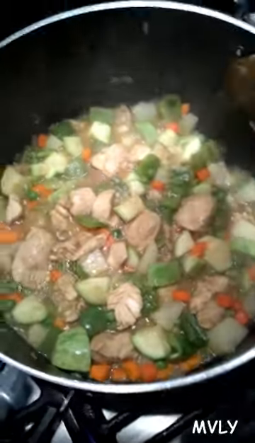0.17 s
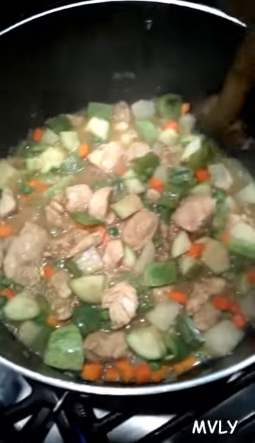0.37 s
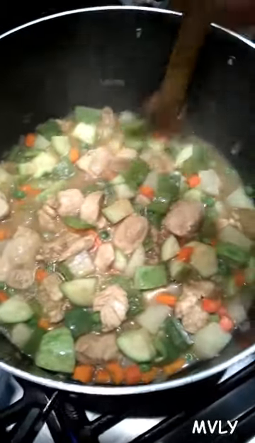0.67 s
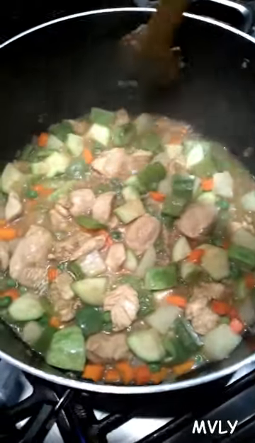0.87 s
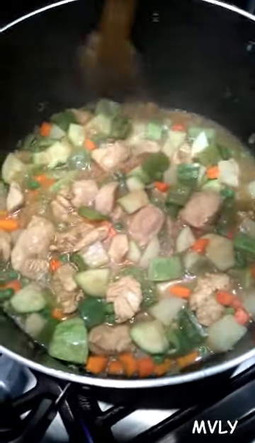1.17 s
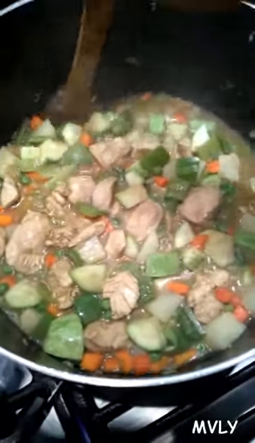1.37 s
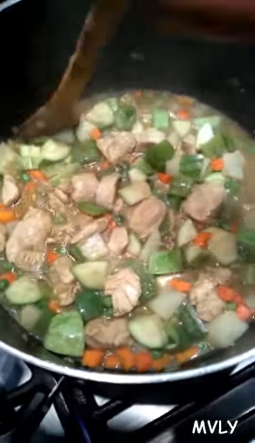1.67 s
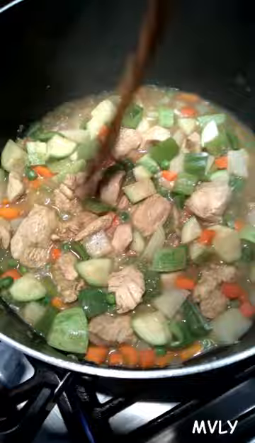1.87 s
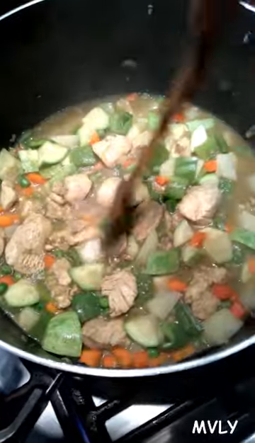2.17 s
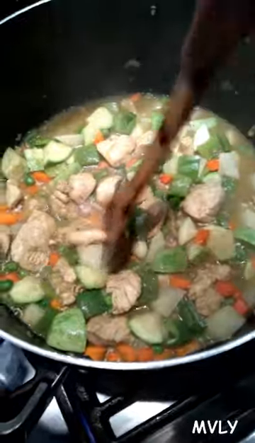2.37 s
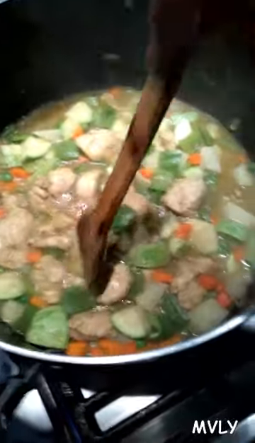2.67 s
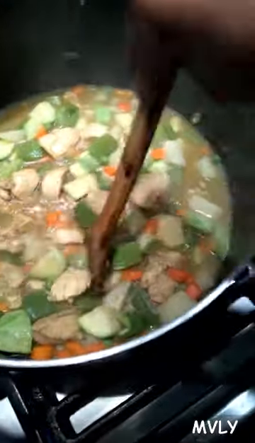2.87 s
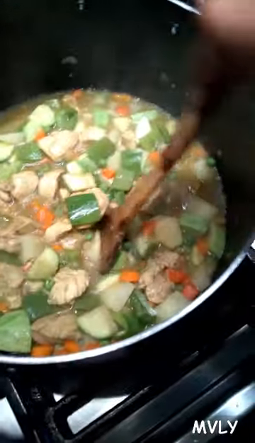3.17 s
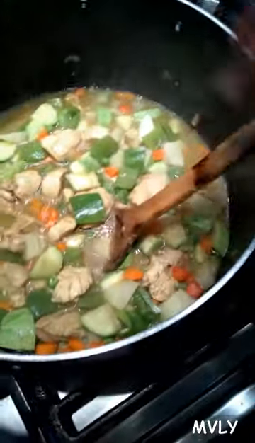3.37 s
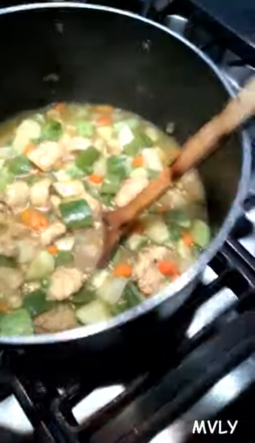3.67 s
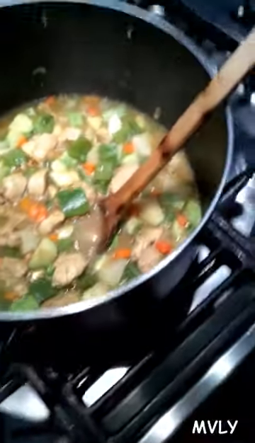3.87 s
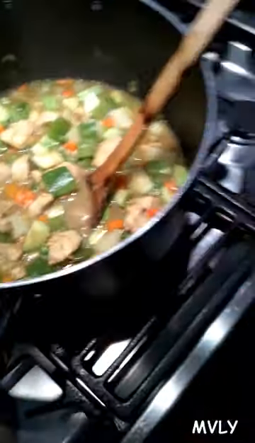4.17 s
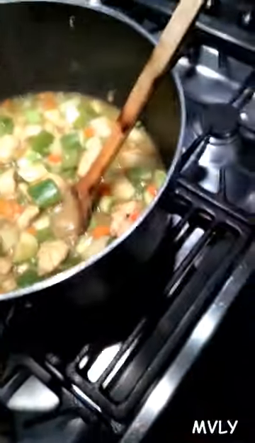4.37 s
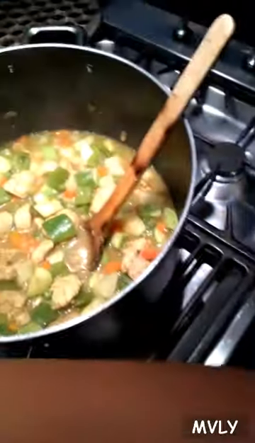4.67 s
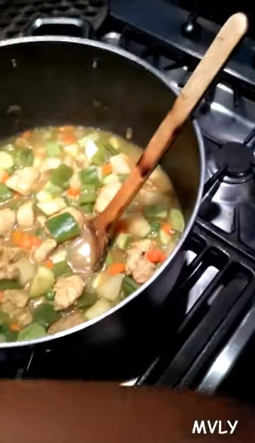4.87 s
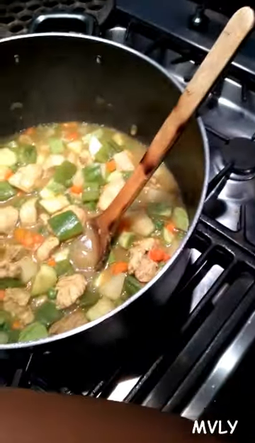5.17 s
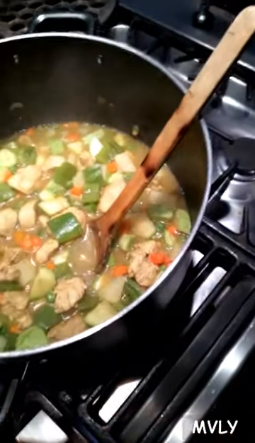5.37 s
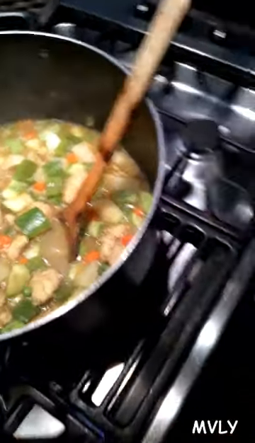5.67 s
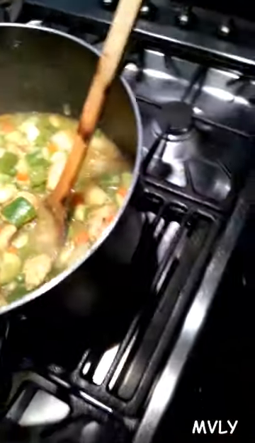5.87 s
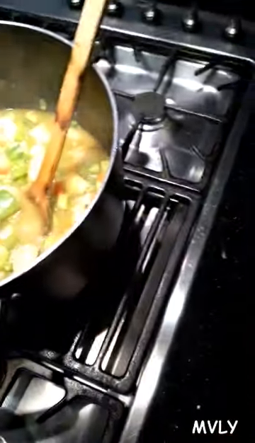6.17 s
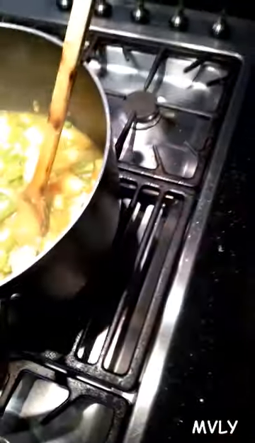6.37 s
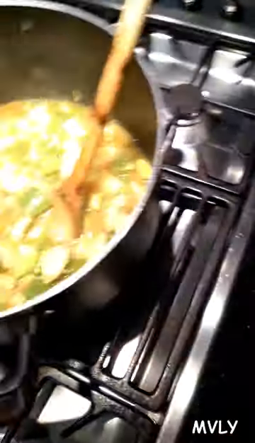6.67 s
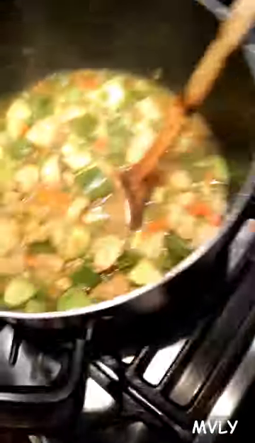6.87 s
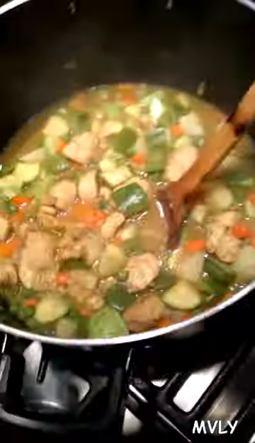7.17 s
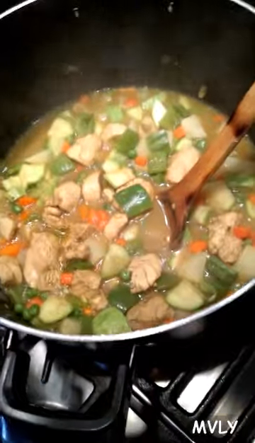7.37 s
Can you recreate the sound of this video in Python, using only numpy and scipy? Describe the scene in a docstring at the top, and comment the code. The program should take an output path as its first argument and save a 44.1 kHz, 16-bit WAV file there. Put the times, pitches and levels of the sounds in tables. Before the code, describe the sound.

A close handheld phone hears stew simmering in a metal pot on a gas hob. Sharp, dry, bright bubble ticks burst in uneven clumps, leaning left, with crackling froth, fine fizz and faint gurgles beneath. At 0.2 s a wooden spoon gives a quick double clack on the pot; pops follow until about 1 s. Very faint spoon touches come at 1.05 and 1.4 s, then pops thicken from 1.6 to 2.9 s with tiny crackling runs. Strong pops cluster at 3.2 s; at 3.37 s the spoon drops on the rim in a brief slowing wood-and-metal rattle, with another strong pop at 3.4 s. Ticks, small plops and wet squelches continue, busy from 5 to 5.8 s. About 5.9-6.6 s is nearly quiet, then sparse ticks return to 7.5 s. Soft burner rush, faint low hum, dull handling bumps near 4.5 and 6.1 s, and short kitchen echo.

```python
"""Kitchen, gas hob: a chicken and vegetable curry simmers in a metal pot, heard by a phone held over the rim.
Bubbles burst with sharp ticks that rattle round the pot (clicks through random wall reflections).
A wooden spoon knocks the wall, stirs, and drops against the rim (decaying modes plus a noise crack).
Fizz, dense bubble runs and squelches are coloured clicks; gurgles, taps and plops are short tones.
Behind them: a short echo, burner noise, mains hum and dull rumbles of the held phone."""
import sys
import numpy as np
from scipy import signal
from scipy.fft import rfft, irfft
from scipy.io import wavfile

SR = 44100
rng = np.random.default_rng(int(sys.argv[2]) if len(sys.argv) > 2 else 0)


def master(y):
    """Save y as 16-bit WAV."""
    cut = np.clip(np.atleast_2d(y).T, -1, 1)
    pcm = np.round(cut * 32767)  # scale
    wavfile.write(sys.argv[1], SR, pcm.astype(np.int16))


N = 331632
T = np.arange(N) / SR
HIT = T[:SR // 2]  # time axis of one struck sound [s]


def undb(db):
    """Decibels to gain."""
    return 10 ** (np.asarray(db) / 20)


def unit(x):
    """Scale to rms 1."""
    return x / np.sqrt(np.mean(x ** 2))


def burst(x):
    """Scale to the energy of 3 ms at rms 1."""
    return x * np.sqrt(.003 * SR / np.sum(x ** 2))


def along(points, hz):
    """Read (frequency [Hz], value) points on a log-frequency axis."""
    f, value = np.transpose(points)
    return np.interp(np.log(hz + 1), np.log(f), value)


def colour(x, points):
    """Causal minimum-phase filter with the given (frequency [Hz], gain [dB]) response."""
    size = 2048
    gain = undb(along(points, np.fft.rfftfreq(size, 1 / SR)))
    cepstrum = irfft(np.log(gain))
    # fold the cepstrum onto positive time
    cepstrum[1:size // 2] *= 2
    cepstrum[size // 2 + 1:] = 0
    response = irfft(np.exp(rfft(cepstrum)))
    return signal.fftconvolve(x, response[None], axes=-1)[:, :x.shape[-1]]


def sides(pan_db):
    """Left and right gains of total power 1; pan is left minus right."""
    gains = undb(np.array([[pan_db], [-pan_db]]) / 2)
    return gains / np.sqrt(np.sum(gains ** 2))


def add(track, start_s, x):
    """Mix a sound into the track."""
    start = max(int(start_s * SR), 0)
    track[:, start:start + x.shape[1]] += x[:, :N - start]


def ring(modes, wander=0.0022, patchy_db=3, t=HIT):
    """Decaying modes: the point of contact favours some; each reaches the two ports at its own phases."""
    out = 0
    for hz, db, t60_s in modes:
        detuned_hz = hz * (1 + wander * rng.standard_normal())
        phase = 2 * np.pi * (detuned_hz * t + rng.random((2, 1)))
        level_db = db + patchy_db * rng.uniform(-0.11, 1) - 60 * t / t60_s
        out = out + undb(level_db) * np.sin(phase)
    return out * (1 - np.exp(-t * SR / 8))  # onset over 8 samples


def crackle(rate_hz, spread_db, pan_db, scatter_db=5):
    """Countless tiny bursts of very unequal size, scattered over the surface."""
    size_db = spread_db * np.minimum(rng.exponential(size=N), 4)
    size = undb(size_db) * (rng.random(N) < rate_hz / SR)
    sign = rng.choice([-1, 1], (2, N))
    clicks = size * sign * undb(scatter_db * rng.uniform(-1.56, 1, (2, N)))
    return unit(clicks) * sides(pan_db)


# bubbles bursting in clumps:
# (time [s], level [dB], left minus right [dB], midrange body [dB], top-treble edge [dB])
POPS = [(.282, -15, -9, -14, 9), (.6042, -29, -5, -18, 5), (.6502, -22.5, 1, -13, -6),
        (0.6764, -24.5, -21, -14, 0), (0.7646, -26.5, -14, -24, 31), (0.881, -24.5, -3, -2, -2),
        (.938, -18.5, -25, -11, 15), (1.389, -18, -13, 6, 18), (1.6226, -36, -12, -8, 32),
        (1.6337, -33.5, -14, 2, 18), (1.684, -28, -3, -22, 6), (1.7796, -17, -11, -20, 19),
        (1.8564, -19, -2, -4, 8), (1.9939, -16.5, -14.5, 2, 10), (2.07, -25, -7, -1, -16),
        (2.128, -17.5, -7, -22, 11), (2.16, -23, -27, -23, 16), (2.4492, -32.5, -2, 2.5, -21),
        (2.5433, -23.5, -2, -11, 8), (2.6325, -17, -11, -1, 29), (2.6411, -24, -11, -9, 29),
        (2.722, -19, -8, -8, 13), (2.9094, -29.5, -19, -13, 22), (3.1546, -24, 7, 5.5, 14),
        (3.1655, -20, -20, 3, 0), (3.1794, -25.5, 3, 4, 8), (3.1985, -13, -10, -21, 4),
        (3.2062, -8.5, -5.5, -10.5, -4.5), (3.3542, -27, -12, -10, 19), (3.4033, -10.5, -14, -8, 8),
        (3.492, -19, -17, -3, 27), (3.8772, -29, -16, -8, 3), (3.8865, -23, -19, -4, 18),
        (4.005, -29.5, -18, 3, 40), (4.193, -32.5, -7, -3, 16), (4.2588, -19, -13, 0, 24),
        (4.27, -28.5, -3, 18.5, 14), (4.4894, -34.5, -23, -5, 29), (4.558, -14.5, -13, 5, 20),
        (4.614, -30, -24, -29, 12), (4.6525, -27, -18, -32, 4), (4.7843, -37.5, -12, -17, 10),
        (4.9016, -27, 3, 18.5, -18), (5.0097, -18, -2, 9.5, 14), (5.0324, -22.5, -17, -3, 0),
        (5.1665, -26.5, -10, -1, -6), (5.2128, -20, -6, 5.5, 0), (5.231, -24, -13, 3, 14),
        (5.2532, -24, -21, -12, 10), (5.311, -16.5, -26, -2, 21), (5.399, -22.5, -8, 11, 12),
        (5.5533, -18, -5, 10, 19), (5.57, -16, -14, 7, 11), (5.607, -19, -2, 0, -5),
        (5.644, -18, -23, -7, 18), (5.7738, -29.5, -1, 13.5, -5), (6.6565, -33.5, 7, 14.5, -42),
        (6.811, -35.5, -10, 19, -5), (6.979, -20.5, -8.5, -12, 12), (7.045, -21.5, -5, -6.5, -2),
        (7.275, -34, -2, 25, 18), (7.4122, -27, 0.5, 15.5, -52), (7.476, -29, 0, 5.5, -24)]


def clumps(count=2, lag_s=.005, neighbour_db=-10, recover_s=0.0038, scatter_db=3, pan_scatter_db=4):
    """A burst sets off its neighbours: weaker ticks of like colour, weakest while the sauce still recoils."""
    rows = list(POPS)
    chances = rng.uniform(-0.92, 1, (len(POPS), count, 3))
    for (s, db, pan_db, body_db, edge_db), chance in zip(POPS, chances):
        for k, (when, size, place) in enumerate(chance):
            lag = lag_s * (k + abs(1 + when) / 2)
            recoil_db = 20 * np.log10(1 - np.exp(-lag / recover_s))
            tick_db = db + neighbour_db + recoil_db + scatter_db * size
            rows.append((s + lag, tick_db, pan_db + pan_scatter_db * place, body_db, edge_db))
    return rows


def tick(since, start, stretch, swell_s=0.0008, fade_s=0.00081, noise_db=-8, faint_s=0.0095, faint_db=-36):
    """A sharp tick in a short noise swell and fade, with sparse faint clicks around it."""
    count = len(since)
    envelope = np.exp(-np.abs(since) / (stretch * np.where(since < 0, swell_s, fade_s)))
    wave = undb(noise_db) * envelope * rng.standard_normal(count)
    wave[start] += 1
    clicks = rng.standard_normal(count) * (rng.random(count) < .01) * 10
    return wave + undb(faint_db) * stretch * clicks * np.exp(-np.abs(since) / faint_s)


def pot_wall(t, wall_s=0.0041, wall_db=-14):
    """Direct path plus dying wall reflections; the sound reaches the right port first."""
    echoes = rng.uniform(-1, 1, (2, len(t))) ** 9  # few strong, most faint
    paths = undb(wall_db) * np.exp(-t / wall_s) * echoes
    paths[1, 0] += 1
    paths[0, 17] += 1  # delayed 17 samples
    return paths


# tick of a bursting bubble: (frequency [Hz], gain [dB])
POP_COLOUR = [(150, -35.5), (800, -44.5), (2600, -28.5), (4500, -28), (6200, -14), (8300, -10), (9200, 1.5),
              (9800, 0.5), (10800, -11), (12000, -21), (15000, -33.5)]


def pops(body_stretch=0.23, cavity_hz=3200, cavity_t60_s=0.01, cavity_db=-31, far_db=-7, aim=0.5):
    """Bursts tick, longer when full-bodied; the wall reflects them. Returns direct sound and echo feed."""
    direct, spread = np.zeros((2, N)), np.zeros((2, N))
    lead_s = .006
    t = T[:SR // 16]
    since, start = t - lead_s, int(lead_s * SR)
    hz, base_db = np.transpose(POP_COLOUR)
    body = along([(900, 0.64), (2600, 1.0), (4500, 1.0), (8000, 0.021)], hz)
    edge = along([(10000, 0.2), (13000, 0.98)], hz)
    for s, db, pan_db, body_db, edge_db in clumps():
        source = tick(since, start, stretch=undb(body_stretch * body_db))
        wave = signal.fftconvolve(pot_wall(t), source[None], axes=-1)[:, :len(t)]
        wave = colour(wave, np.c_[hz, base_db + body * body_db + edge * edge_db])
        # the opened hollow rings briefly, most in full-bodied bursts
        hollow = ring([(cavity_hz, 0, cavity_t60_s)], wander=0.22, t=t[:-start])
        hollow = np.pad(hollow, ((0, 0), (start, 0)))
        hollow_db = cavity_db + 1.53 * min(body_db, 20)
        wave = burst(wave) + undb(hollow_db) * burst(hollow)
        wave = np.array([burst(side) for side in wave]) * undb(db)
        add(direct, s - lead_s, wave * sides(pan_db))
        # the closer under the right port, the less a bubble feeds the kitchen
        add(spread, s - lead_s, wave * undb(far_db + aim * pan_db))
    return direct, spread


def froth(level_db=-21, fade_s=0.032, rate_hz=900, spread_db=9.5, pan_db=-8, midrange_db=7):
    """Each burst leaves a patch of froth whose tiny bubbles crackle away."""
    power = np.zeros((1, N))
    for s, db, *_ in POPS:
        patch = undb(db) * np.exp(-HIT / fade_s)
        add(power, s, patch[None] ** 2)
    grains = colour(crackle(rate_hz, spread_db, pan_db), POP_COLOUR)
    grains = colour(grains, [(4500, midrange_db), (8000, 0.0045)])
    return unit(grains) * np.sqrt(power) * undb(level_db)


# spoon on pot: (time [s], relative level [dB], wood [dB], metal [dB], crack [dB], weight [dB],
# left minus right [dB], length of the rattle [s])
KNOCKS = [(0.181, -21.5, -6.5, -14.5, -0.5, 1, -0.5, 0.003), (.185, -16, -11.5, -2.5, -0.5, -10, 3, 0.003),
          (1.0502, -32, 1.5, -27, -0.5, 2.5, 1.5, 0.00022),
          (1.3745, -34, -0.5, -21.5, -5, 9.5, 4.5, 0.00014), (3.3687, -20, -4, -4.5, 3, 10.5, 1, .064)]


def contacts(count=8, gap_s=.0042, slowing=1.24, fall_db=-2.0, soften_db=-2.0, settle_db=1.5):
    """The spoon rattles after a blow: each contact comes later, weaker, softer and heavier."""
    lags = np.r_[0, np.cumsum(gap_s * slowing ** np.arange(count - 1))]
    rows = []
    for s, db, wood_db, metal_db, crack_db, weight_db, pan_db, length_s in KNOCKS:
        for k, lag in enumerate(lags):
            if k == 0 or lag < length_s:
                rows.append((s + lag, db + k * fall_db, wood_db, metal_db, crack_db + k * soften_db,
                             weight_db + k * settle_db, pan_db))
    return rows


# modes of the spoon: (frequency [Hz], level [dB], t60 [s])
WOOD = [(299, -21, 0.16), (442, -18.5, 0.087), (850, -7, 0.043), (1301, -9, 0.052), (2170, -4, 0.033),
        (2353, -7, 0.066), (2720, 3.5, 0.038), (2938, 1, 0.048)]
# modes of the filled pot: (frequency [Hz], level [dB], t60 [s])
METAL = [(303, -17, 0.19), (787, -23, .28), (906, -26, .22), (1133, -19, .25), (1310, -21, 0.18),
         (2560, -15.5, .2), (3010, -6.5, .11), (3110, -8, .14), (3194, -6.5, 0.16), (3280, 0, 0.088),
         (3470, 4, 0.102), (3640, -1.5, 0.11), (3714, -10, 0.15), (3920, 6.5, 0.107), (4100, -6, 0.12),
         (4600, -14, 0.132), (5200, -16.5, .15), (5210, -6.5, 0.12), (5700, -9.5, 0.14)]
# crack of the contact: (frequency [Hz], gain [dB])
CRACK = [(200, -7.5), (550, -10), (1500, -3.5), (2200, -8), (3000, 2.5), (3900, 8.5), (4300, 1),
         (4900, -3.5), (5300, 2.5), (6250, -2.5), (7500, -1.5), (9200, 1.5), (11500, -16.5), (15000, -25.5)]


def knocks(crack_s=0.0051, shell_s=0.013, shell_db=-17, wood_trim_db=3, metal_trim_db=4, crack_trim_db=0,
           wood_far_db=-9):
    """Blows ring spoon and pot over a crack dying in the pot's dense high modes; weight lifts the lows."""
    direct, spread = np.zeros((2, N)), np.zeros((2, N))
    for s, db, wood_db, metal_db, crack_db, weight_db, pan_db in contacts():
        fade = np.exp(-HIT / crack_s) + undb(shell_db) * np.exp(-HIT / shell_s)
        crack = colour(rng.standard_normal((2, len(HIT))) * fade, CRACK)
        spoon = undb(wood_db + wood_trim_db) * burst(ring(WOOD, wander=0.0079, patchy_db=1.5))
        pot = undb(metal_db + metal_trim_db) * burst(ring(METAL, patchy_db=-1.5))
        pot = pot + undb(crack_db + crack_trim_db) * burst(crack)
        weight = [(100, -30.0), (280, 1.0 * weight_db), (800, 0.72 * weight_db),
                  (1400, 0.9 * weight_db), (2900, 8.0)]
        gain = 2 * undb(db) * sides(pan_db)
        add(direct, s, gain * colour(pot + spoon, weight))
        # the broad pot wall radiates into the room better than the slim spoon
        add(spread, s, gain * colour(pot + undb(wood_far_db) * spoon, weight))
    return direct, spread


# sauce squelches and the spoon slides: (time [s], length [s], centre [Hz], level [dB])
SQUELCHES = [(0, 0.041, 3530, -49.5), (0.42, 0.064, 1140, -59), (0.833, 0.016, 3400, -39.5),
             (1.24, 0.0096, 3150, -45), (3.166, 0.072, 850, -57.5), (3.269, 0.0046, 3970, -41.5),
             (4.161, 0.0094, 1080, -54), (4.799, 0.018, 900, -55.5), (6.347, 0.014, 1070, -55),
             (6.616, 0.006, 3780, -40.5), (6.75, 0.016, 4240, -47.5), (6.845, 0.0076, 4000, -46.5),
             (7.337, 0.075, 5440, -56.5)]


def squelches():
    """Wet pieces slide and part: dense clicks, coloured by the gap, swell quickly and fade slower."""
    out = np.zeros((2, N))
    t = T[:SR] - .5
    for s, length_s, hz, db in SQUELCHES:
        sparse = rng.random(SR) < .08
        clicks = sparse * rng.standard_normal((2, SR))
        gap = [(hz / 4, -30), (hz / 1.38, -13), (hz, 0), (1.45 * hz, -15), (3 * hz, -36)]
        wet = unit(colour(clicks, gap))
        width_s = np.where(t < 0, length_s / 2, length_s)
        swell = wet * undb(db) * np.exp(-(t / width_s) ** 2 / 2)
        add(out, s - .5, swell[:, t + s >= 0])
    return out


# dense runs of tiny bubble bursts: (time [s], length [s], level per layer [dB])
BUBBLE_RUNS = [(.675, 0.021, -46), (0.903, 0.012, -57), (2.669, 0.019, -43.5), (2.729, 0.0044, -53),
               (4.837, 0.011, -45.5), (4.9, 0.033, -57), (5.065, 0.016, -45.5), (5.821, 0.011, -50),
               (7.097, 0.021, -48.5)]


def bubble_runs(rate_hz=3200, spread_db=4, pan_db=-9, midrange_db=13, top_db=4):
    """Dense runs of tiny bubble bursts: a short crackling swell each."""
    swell = 0
    for s, length_s, db in BUBBLE_RUNS:
        swell = swell + undb(db) * np.exp(-((T - s) / length_s) ** 2 / 2)
    grains = colour(crackle(rate_hz, spread_db, pan_db), POP_COLOUR)
    return swell * unit(colour(grains, [(4000, midrange_db), (9000, 0), (13000, top_db)]))


# dull taps and bubble plops: (time [s], starting pitch [Hz], level [dB], t60 [s])
LOW_TONES = [(1.881, 1040, -35, 0.0093), (1.881, 1120, -37, .004), (4.559, 660, -36, 0.013),
             (4.88, 1890, -25, 0.0047), (5.64, 427, -41, 0.096), (6.088, 1007, -37, 0.02)]


def low_tones(glide_per_s=1.5):
    """Short low tones: dull taps and bubble plops, gliding up slightly where they last."""
    out = np.zeros((2, N))
    for s, hz, db, t60_s in LOW_TONES:
        tone = np.sin(2 * np.pi * hz * HIT * (1 + glide_per_s * HIT))
        wave = tone * undb(db - 60 * HIT / t60_s) * (1 - np.exp(-HIT / 0.00047))
        add(out, s, wave * np.ones((2, 1)))
    return out


def gurgle(rate_hz, low_hz, high_hz, cycles, spread_db, glide=0.097):
    """Bubbles under the surface: each rings for a few cycles and rises a little in pitch."""
    out = np.zeros((2, N))
    for when, pitch, size, pan in rng.random((int(rate_hz * N / SR), 4)):
        hz = low_hz * (high_hz / low_hz) ** pitch
        age = np.arange(int(cycles * SR / hz)) * hz / (cycles * SR)  # 0 to 1 over its life
        tone = np.sin(2 * np.pi * cycles * age * (1 + glide * age / 2))
        wave = tone * undb(-45 * age) * (1 - np.exp(-age * cycles))
        size_db = -spread_db * np.log(1 - .97 * size)
        add(out, when * N / SR, wave * undb(size_db) * sides(10 * (pan - .5)))
    return unit(out)


# fizz of the smallest bubbles: (time [s], level [dB])
SIMMER = [(0, -55), (2.9, -61.5), (3.4, -47), (3.8, -57), (4.5, -58), (5.6, -55.5), (5.95, -64),
          (6.5, -64.5), (7.5, -54)]
# its colour: (frequency [Hz], gain [dB])
FIZZ = [(1500, -21.5), (4500, -34), (7000, -15), (9700, -1.5), (11500, -14), (15000, -22)]


def simmer(shallow_db=-70, deep_db=-67):
    """Fine fizz at the edge of the pot, and bubbles working below the surface."""
    fizz_db = np.interp(T, *np.transpose(SIMMER))
    fizz = unit(colour(crackle(rate_hz=650, spread_db=6.5, pan_db=-14.0), FIZZ))
    shallow = gurgle(rate_hz=300, low_hz=623, high_hz=2550, cycles=12.08, spread_db=2.5)
    deep = gurgle(rate_hz=110, low_hz=232.0, high_hz=531, cycles=9.1, spread_db=0.0)
    return fizz * undb(fizz_db) + shallow * undb(shallow_db) + deep * undb(deep_db)


# the hand shifts on the phone: (time [s], pitch [Hz], level [dB], length [s])
BUMPS = [(3.043, 55, -54, 0.018), (4.521, 62, -41.5, 0.044), (6.114, 174, -52, 0.022)]


def bumps(pan_db=9):
    """Dull rumbles through the body of the phone: low noise under a bell-shaped swell."""
    out = 0
    for s, hz, db, length_s in BUMPS:
        body = [(hz / 2, -24), (hz, 0), (2 * hz, -14), (6 * hz, -45), (20 * hz, -80)]
        rumble = unit(colour(rng.standard_normal((1, N)), body))
        out = out + rumble * undb(db) * np.exp(-((T - s) / length_s) ** 2 / 2)
    return out * sides(pan_db)


# kitchen echo spectrum: (frequency [Hz], relative gain [dB])
ECHO = [(200, 1), (1000, 5.5), (3500, -2.5), (7000, 4.5), (9800, 1), (15000, 9.5)]
# its decay: (frequency [Hz], t60 [s])
ECHO_T60 = [(200, 0.33), (3500, 0.41), (9000, 0.28), (15000, 0.24)]


def kitchen(x, build_s=0.006, first_density=0.023, merge_s=.12):
    """Echo of a small hard room: separate reflections thicken into a wash; the treble dies first."""
    density = np.clip(first_density + (HIT / merge_s) ** 2, .001, 1)
    present = rng.random((2, len(HIT))) < density
    reflections = rng.standard_normal((2, len(HIT))) * present / np.sqrt(density)
    f, t, cells = signal.stft(reflections, SR, nperseg=256)
    cells = cells * undb(along(ECHO, f)[:, None] - 60 * t / along(ECHO_T60, f)[:, None])
    tail = signal.istft(cells, SR)[1][:, :len(HIT)] * (1 - np.exp(-HIT / build_s))
    tail = tail / np.sqrt(np.sum(tail ** 2) / 2)  # mean energy 1 per side
    return signal.fftconvolve(x, tail, axes=-1)[:, :N]


# burner and kitchen air: (frequency [Hz], relative gain [dB])
BURNER = [(15, -60), (25, -20), (48, -14), (73, -13), (106, 0.5), (172, -6.5), (326, -10.5), (438, -3),
          (691, -17), (1860, -18), (2370, -15.5), (4870, -21.5), (7090, -22), (9520, -14), (15000, -37.5)]
# likeness of the two ports: (frequency [Hz], left-right correlation [-1 to 1])
LIKENESS = [(150, .95), (300, 1), (600, 0.12), (1500, 0)]


def burner(rush_db=-55, hum_hz=101, hum_db=-63.5):
    """Soft steady rush of the flame, alike at both ports in the bass, with mains hum."""
    hz = np.fft.rfftfreq(N, 1 / SR)
    alike = np.clip(along(LIKENESS, hz), -1, 1)
    mid, side = rfft(rng.standard_normal((2, N))) * undb(along(BURNER, hz))
    opposed = np.array([[1], [-1]]) * side * np.sqrt(1 - alike)
    rush = irfft(mid * np.sqrt(1 + alike) + opposed, N)
    hum = np.sqrt(2) * np.sin(2 * np.pi * hum_hz * T)
    return unit(rush) * undb(rush_db) + undb(hum_db) * hum


def scene(pop_room_db=4, spoon_room_db=-5, sauce_room_db=-3):
    """Pot, spoon and hob in the kitchen."""
    ticks, ticks_far = pops()
    spoon, spoon_far = knocks()
    runs = bubble_runs() + bubble_runs()  # two independent layers of grains
    sauce = simmer() + low_tones() + squelches() + runs
    to_room = undb(pop_room_db) * ticks_far + undb(spoon_room_db) * spoon_far + undb(sauce_room_db) * sauce
    return ticks + froth() + spoon + sauce + kitchen(to_room) + burner() + bumps()


def record(dry, low_hz=42, top_hz=15300, clip=.82):
    """The phone thins the deep bass, clips the sharpest peaks and cuts the top."""
    thin = signal.sosfilt(signal.butter(2, low_hz, "high", fs=SR, output="sos"), dry)
    top_cut = signal.ellip(8, .2, 70, top_hz, fs=SR, output="sos")
    return signal.sosfilt(top_cut, np.clip(thin, -clip, clip))


dry = scene()
out = record(dry)
master(out)
```